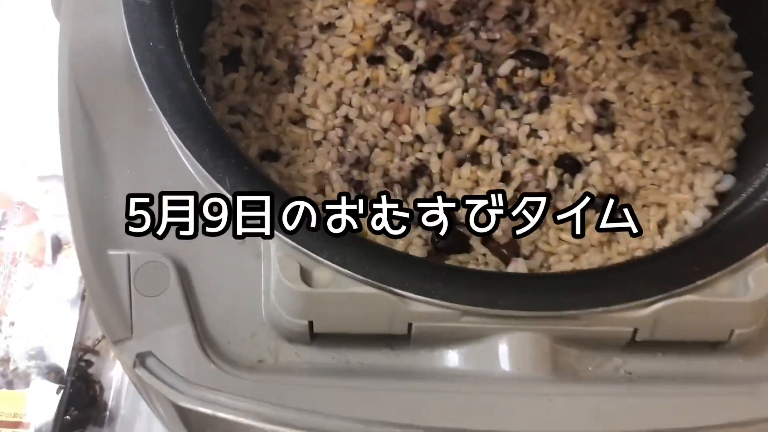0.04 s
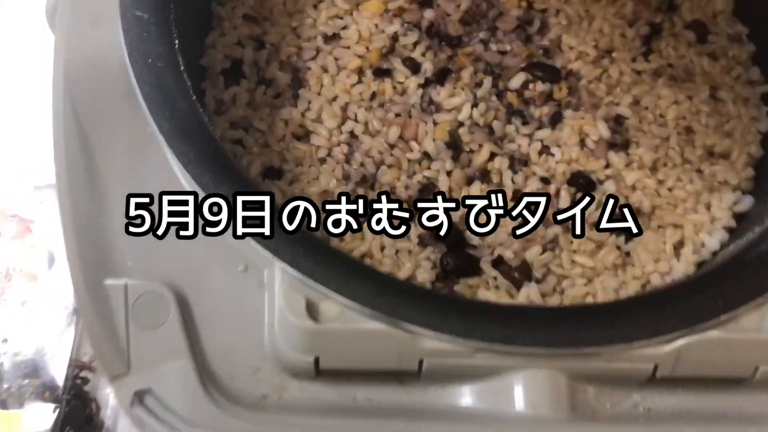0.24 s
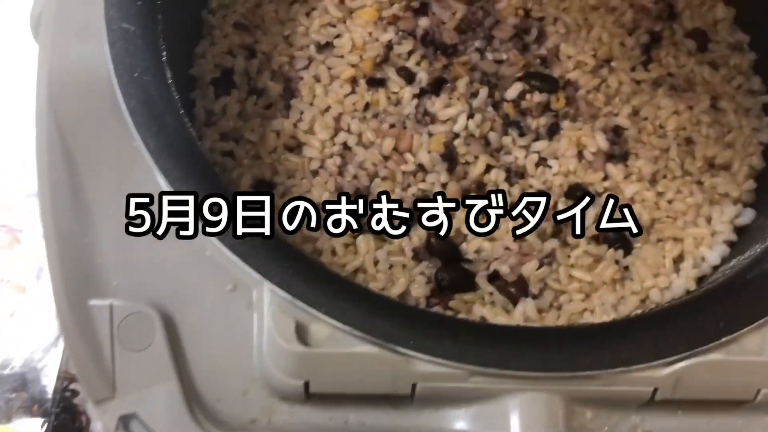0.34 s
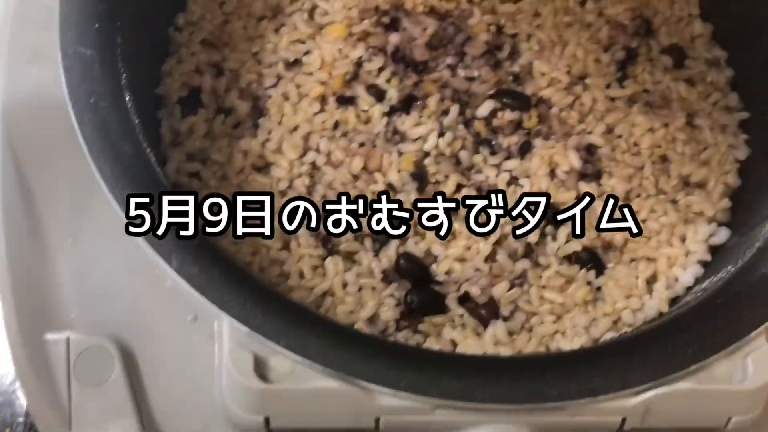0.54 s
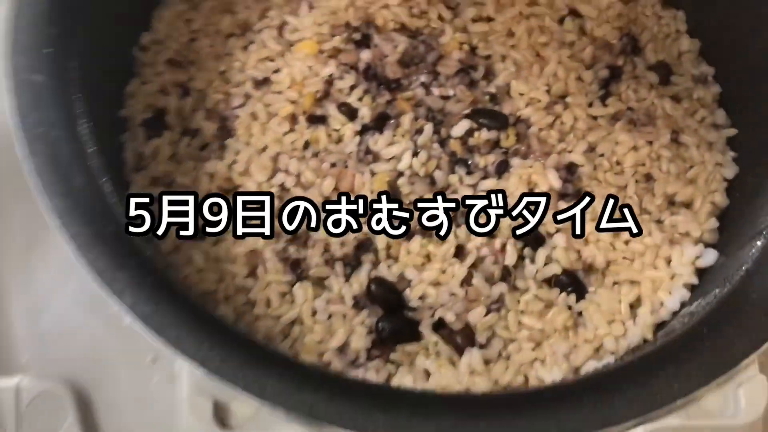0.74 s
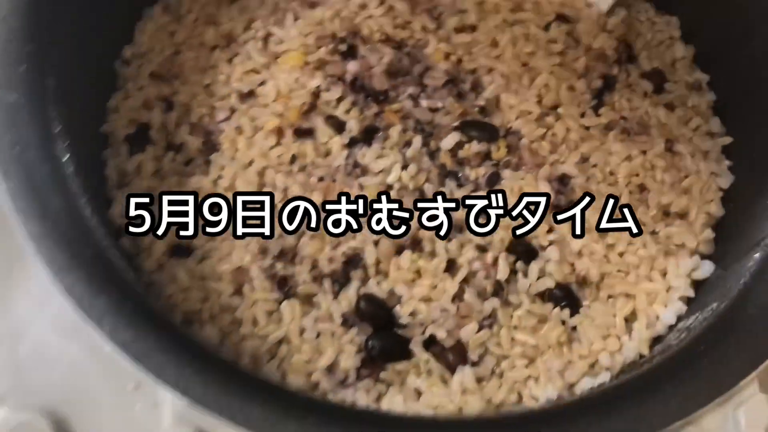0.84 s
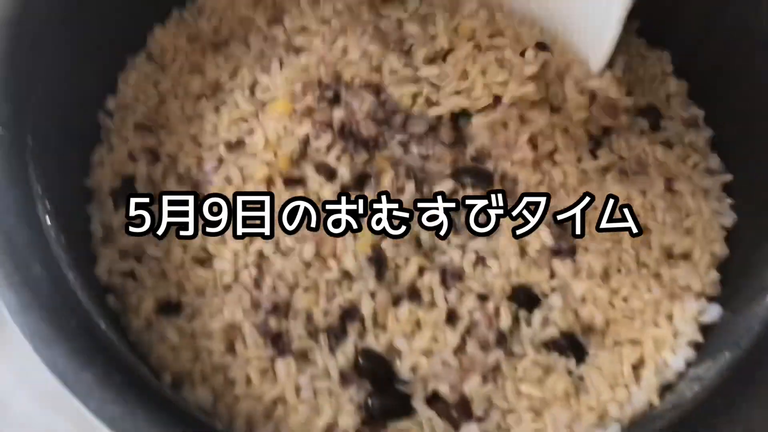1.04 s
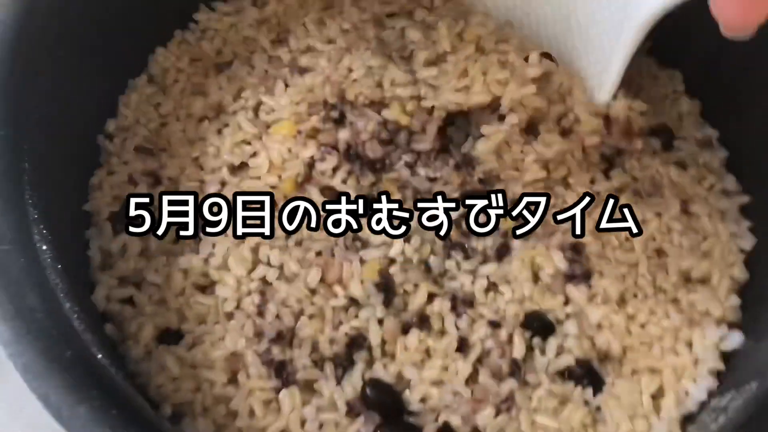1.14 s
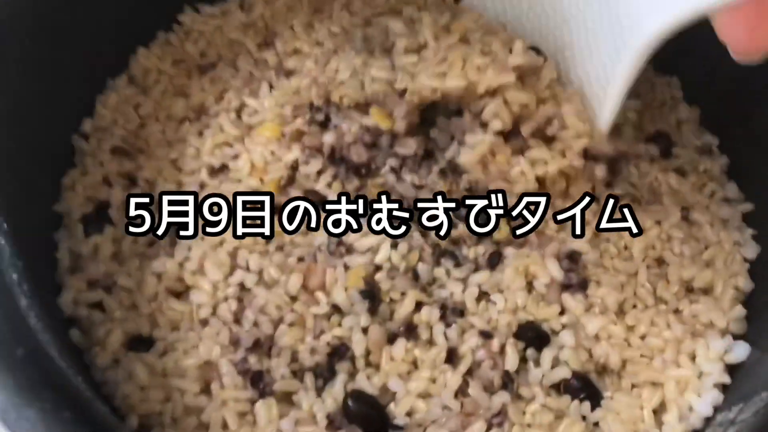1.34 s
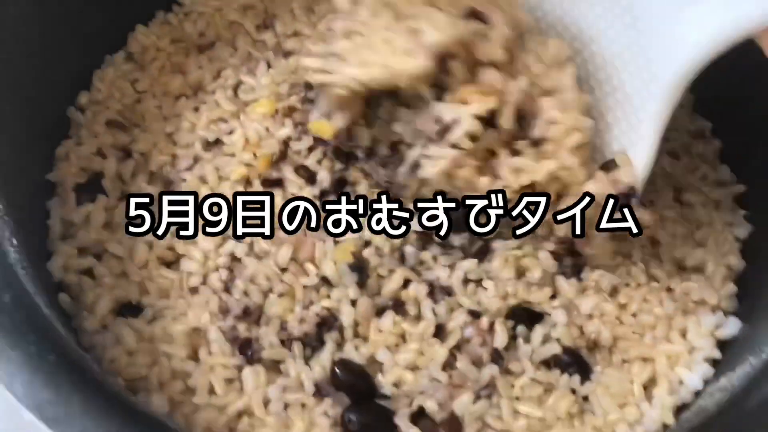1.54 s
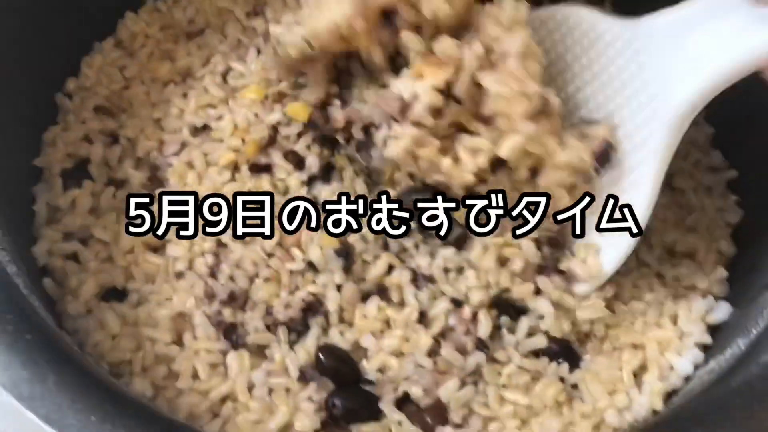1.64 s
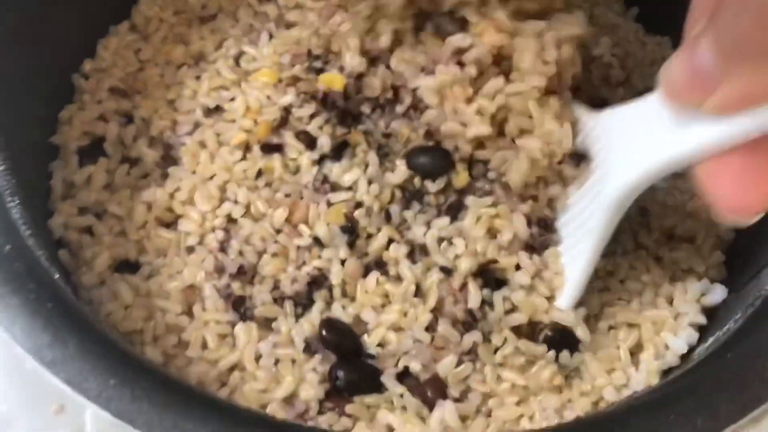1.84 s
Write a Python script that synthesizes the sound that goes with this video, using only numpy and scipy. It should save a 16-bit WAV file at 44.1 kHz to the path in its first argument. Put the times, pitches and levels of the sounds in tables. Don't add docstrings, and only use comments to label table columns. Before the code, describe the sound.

A plastic rice paddle snaps loose with one hard crack, then knocks, scrapes and stirs sticky rice

```python
import sys
import numpy as np
from scipy import signal
from scipy.fft import rfft, irfft
from scipy.io import wavfile
from scipy.ndimage import uniform_filter1d

SR = 44100
rng = np.random.default_rng(int(sys.argv[2]) if len(sys.argv) > 2 else 0)


def field_ratio(decibels):
    return 10 ** (np.asarray(decibels, dtype=float) / 20)


def inscribe(sig):
    pcm = np.round(np.clip(np.atleast_2d(sig).T, -1, 1) * 32767)
    wavfile.write(sys.argv[1], SR, pcm.astype(np.int16))


N = 83790


def level(x, db=0):
    return x * field_ratio(db) / np.sqrt(np.mean(x ** 2))


def colour(x, points):
    p = np.array(points, float)
    hz = np.fft.rfftfreq(len(x), 1 / SR)
    gain_db = np.interp(np.log(hz + 1), np.log(p[:, 0]), p[:, 1])
    return irfft(rfft(x) * field_ratio(gain_db), len(x))


def band(x, hz, width):
    sharpness = max(hz / width, .3)
    return signal.lfilter(*signal.iirpeak(min(hz, .4 * SR), sharpness, SR), x)


def walk(rate):
    k = int(SR / rate)
    steps = np.repeat(rng.standard_normal(N // k + 1), k)
    return 1.30 * uniform_filter1d(uniform_filter1d(steps, k), k)[:N]


def curve(rows):
    p = np.array(rows, float)
    return field_ratio(np.interp(np.arange(N) / SR, p[:, 0], p[:, 1], -120, -120))


def ring(hz, t60, rise_s=0.0001):
    t = np.arange(int(.3 * SR)) / SR
    return np.sin(2 * np.pi * hz * t) * field_ratio(-60 * t / t60) * (1 - np.exp(-t / rise_s))


def add(out, at_s, x):
    i = int(at_s * SR)
    out[i:i + len(x)] += x[:max(len(out) - i, 0)]


def grains(rate, spread_db, smooth):
    chance, sign, size = rng.random((3, N))
    slips = (chance < rate / SR) * np.sign(sign - .5) * field_ratio(-spread_db * np.log(size + .03))
    return level(slips) + smooth * rng.standard_normal(N)


def rub(rows, points, rate, spread_db, smooth, patchy_db, pace):
    out = np.zeros(N)
    for lo, hi in [(30, 700), (700, 1800), (1800, 4600), (4600, 20000)]:
        slips = grains(rate, spread_db, smooth) * field_ratio(patchy_db * walk(pace))
        out += signal.lfilter(*signal.butter(2, [lo, hi], "band", fs=SR), slips)
    return level(colour(out, points)) * curve(rows)


def part(rows, width, t60, click):
    out, t = np.zeros(N), np.arange(1000) / SR
    for at, db, hz in rows:
        fizz = rng.standard_normal(len(t)) * field_ratio(-60 * t / t60)
        burst = fizz + click * (t == 0)
        x = band(band(burst, hz, hz * width), hz, hz * width * 1.8)
        add(out, at + 0.0009, field_ratio(db) * x / np.abs(x).max())
    return out


# [f/Hz, level/dB per Hz]
KITCHEN_COLOUR = [(24, -9.5), (50, 6.5), (351, 1.5), (616, -3.5), (913, -9), (1840, -14), (3330, -18),
                  (12100, -24), (16500, -27.5)]
# [t/s, level/dB]
NEARING_GAIN = [(0, 7), (.06, 2), (.2, 2.5), (.3, 10), (1.9, -1)]
# [t/s, level/dB]
HANDLING_GAIN = [(0, -1.5), (.95, 0.5), (1.15, 4.5), (1.45, 2.5), (1.9, 6)]


def kitchen():
    out, noise = np.zeros(N), colour(rng.standard_normal(N), KITCHEN_COLOUR)
    for hz in 25 * 2 ** np.arange(0, 9.6, .5):
        gain = 1
        if hz > 1500:
            gain = curve(NEARING_GAIN)
        elif hz < 90:
            gain = curve(HANDLING_GAIN)
        out += band(noise, hz, hz / 3) * field_ratio(1.2 * walk(8.3)) * gain
    return level(out, -67)


# [t/s, peak level/dB, f/Hz, t60/s]
KNOCK_HITS = [(0.002, -53, 583, 0.036), (0.021, -53, 387, 0.05), (0.063, -42, 482, 0.022),
              (0.074, -54, 420, 0.027), (.092, -64, 483, 0.13), (0.1296, -56.5, 1790, 0.0086),
              (0.131, -58.5, 900, 0.035), (0.304, -38.5, 450, 0.015), (.334, -53.5, 700, .02),
              (0.3742, -37, 1370, 0.011), (.375, -50.5, 2990, 0.024), (.376, -46.5, 526, 0.024),
              (0.451, -49.5, 437, 0.037), (0.477, -48, 1040, 0.018), (0.494, -54.5, 513, 0.028),
              (0.534, -54, 415, 0.037), (0.641, -54.5, 430, 0.028), (0.709, -50.5, 1085, 0.036),
              (.826, -48.5, 1210, 0.02), (.827, -47, 1960, 0.012), (0.8284, -40, 560, 0.012),
              (0.8296, -41, 438, 0.05), (.845, -54.5, 111, 0.05), (0.849, -48.5, 510, 0.038),
              (.861, -57, 462, 0.061), (.932, -44.5, 1183, 0.0098), (0.933, -49.5, 567, 0.021),
              (1.013, -56.5, 1560, 0.0069), (1.429, -55.5, 386, 0.024), (1.713, -54.5, 466, 0.023)]


def knocks():
    bend_hz, bend_s, bend_db = 1973, .0022, -3.5
    rise_cycles, scuff_db, scuff_t60_s = 0.21, -7, 0.017
    out, t = np.zeros(N), np.arange(3000) / SR
    fall = np.exp(-t / bend_s)
    for at, db, hz, t60 in KNOCK_HITS:
        cycles = hz * t + max(bend_hz - hz, 0) * bend_s * (1 - fall)
        bend = np.sin(2 * np.pi * cycles) * t / bend_s * fall
        body = ring(hz, t60, rise_cycles / hz)[:len(t)]
        body = body + field_ratio(bend_db) * bend * (hz > 200)
        add(out, at + .001, field_ratio(db + 4) * band(body, 1.5 * hz, 4 * hz))
        scuff_hz = min(2.5 * hz, 1900)
        scuff = rng.standard_normal(len(t)) * field_ratio(-60 * t / scuff_t60_s)
        scuff = band(band(scuff, scuff_hz, scuff_hz), scuff_hz, scuff_hz)
        add(out, at + 0.000906, field_ratio(db + scuff_db) * scuff / np.abs(scuff).max())
    return out


# [t/s, peak level/dB, f/Hz]
BRIGHT_TICKS = [(0.0493, -50, 7700), (.3695, -51, 7500), (.3755, -40, 6840), (0.4575, -35.5, 7150),
                (.468, -50, 8620), (0.4778, -40.5, 9300), (.485, -55, 12500), (.516, -51, 9000),
                (.522, -51, 12500), (0.531, -37.5, 11600), (0.5345, -43, 11000), (0.5385, -46, 11500),
                (.548, -49, 13000), (.575, -52, 13500), (0.5759, -33, 8100), (0.595, -48, 9500),
                (0.607, -39, 12000), (0.618, -51, 11000), (.627, -54, 13500), (0.6305, -45, 8000),
                (.634, -44, 8460), (0.6451, -38, 8300), (0.6485, -39, 10500), (.661, -50, 6000),
                (.666, -44, 9000), (.6685, -45, 11000), (.707, -53, 9500), (0.7377, -46.5, 8600),
                (0.9462, -47.5, 9900), (0.9524, -49, 10100), (1.182, -41, 10000), (1.192, -36.5, 12000),
                (1.3184, -51, 7540), (1.3969, -38, 9200), (1.458, -57, 10000), (1.5205, -52.5, 6944),
                (1.525, -55, 11500), (1.535, -54, 8500), (1.5574, -50.5, 9400), (1.592, -50, 7870),
                (2, -50, 8500), (1.68, -52, 7600), (1.6904, -51, 11700), (1.7355, -52, 6500)]


def sticky_ticks():
    return part(BRIGHT_TICKS, width=0.55, t60=0.0041, click=4)


# [t/s, level/dB, f/Hz, t60/s]
PING_HITS = [
    (0.0497, -57.5, 6680, 0.03),
    (.806, -65, 6430, 0.057),
]


def pings():
    out = np.zeros(N)
    for at, db, hz, t60 in PING_HITS:
        add(out, at, field_ratio(db) * ring(hz, t60))
    return out


# [f/Hz, level/dB, t60/s]
PADDLE_MODES = [(4714, -9, .016), (5025, -11, .018), (5420, -13, .02), (6424, -3, .013), (6730, -20, .04),
                (7420, -6, .029), (8146, -3, .02), (8850, -13, .045), (9875, -17, .025), (10460, -17, .02),
                (11750, -19, .025)]
# [f/Hz, level/dB, t60/s]
POT_MODES = [(1250, -8, 0.12), (1362, -8.5, .22), (1897, -14.5, 0.34), (2170, -8, 0.089), (2977, -8, 0.27),
             (3686, -11, .3), (4054, -5, 0.089), (4339, -10, .19), (4660, -12, 0.088), (5023, -9.5, 0.12),
             (5400, -12.5, 0.26), (7460, -12, 0.11)]
# [delay t/s, level/dB, f/Hz, t60/s]
HOUSING_THUDS = [(0.0019, -13.5, 578, 0.013), (0.0033, -31.5, 334, 0.065), (0.00922, -44, 430, 0.051),
                 (0.00062, -17, 1300, 0.0076), (0.00042, -17, 2965, 0.025), (.0005, -26, 3720, .015),
                 (.0005, -18.5, 1980, 0.012), (.004, -32, 270, 0.034), (0.0029, -21, 5000, 0.0093)]


def snap():
    at_s, crack_db, crack_s, crack_hz = .2269, -5, 0.00048, 3220
    ring_db, pot_db = -15, -46
    out, t = np.zeros(N), np.arange(2000) / SR
    crack_filter = signal.butter(4, crack_hz, "high", fs=SR)
    for late, db in [(0, 0), (0.0039, -13.5)]:
        burst = rng.standard_normal(len(t)) * np.exp(-t / crack_s)
        add(out, at_s + late, field_ratio(crack_db + db) * signal.lfilter(*crack_filter, burst))
    for k, (hz, db, t60) in enumerate(PADDLE_MODES):
        add(out, at_s, (-1) ** k * field_ratio(ring_db + db) * ring(hz, t60))
    for hz, db, t60 in POT_MODES:
        add(out, at_s, field_ratio(pot_db + db) * ring(hz, t60, .002))
    for late, db, hz, t60 in HOUSING_THUDS:
        add(out, at_s + late, field_ratio(db) * ring(hz, t60, 0.0012))
    return signal.lfilter(*signal.butter(2, 160, "high", fs=SR), out)


# [t/s, level/dB]
RUSTLE_LEVEL = [(.235, -42.5), (.3, -63), (.36, -58.5), (.4, -60.5), (.5, -58.5), (.55, -71), (.567, -54),
                (.585, -70.5), (.67, -64.5), (.7, -76), (.74, -67), (.8, -74)]
# [f/Hz, level/dB per Hz]
RUSTLE_TONE = [(120, -14), (520, 1), (1320, -7), (3190, -13.5), (9060, -11.5), (16000, -27)]


def rustle():
    return rub(RUSTLE_LEVEL, RUSTLE_TONE, 1200, spread_db=3.0, smooth=.8, patchy_db=2.2, pace=60)


# [t/s, peak level/dB, f/Hz]
SMACKS = [(.3035, -46, 1500), (0.3744, -33.5, 2300), (.566, -45.5, 1700), (.569, -51, 4000),
          (0.6685, -40.5, 3800), (1.1316, -46, 6350), (1.182, -39, 5500), (1.3969, -45, 4480),
          (1.4285, -51.5, 3000), (1.62, -39.5, 5900), (1.6239, -39.5, 6580), (1.6525, -39.5, 3200),
          (1.871, -45, 5400)]


def wet_smacks():
    return part(SMACKS, width=0.87, t60=0.0051, click=4)


# [t/s, level/dB]
SLIDE_LEVEL = [(.825, -64), (.84, -53), (.85, -52), (.88, -58), (.895, -70.5), (.93, -100), (.935, -53.5),
               (.96, -76)]
# [f/Hz, level/dB per Hz]
SLIDE_TONE = [(90, -21), (200, -8), (500, -8), (2100, -19.5), (3300, -19), (8200, -27.5), (16000, -38)]


def slide():
    return rub(SLIDE_LEVEL, SLIDE_TONE, 2500, spread_db=3.9, smooth=0.7, patchy_db=2.5, pace=150)


# [t/s, peak level/dB, f/Hz]
POCKETS = [(.8451, -44, 3300), (.849, -50, 2900), (.856, -52, 3700), (.873, -55, 1600), (1.071, -56, 3200),
           (1.378, -56.5, 3310), (1.5917, -54, 3450), (1.596, -55, 3400), (1.621, -46, 3500),
           (1.636, -60, 880), (1.659, -47, 2510), (1.664, -50, 3380), (1.713, -52, 2440),
           (1.807, -56, 2400), (1.813, -59, 3000), (1.818, -52, 2180), (1.823, -46, 2310),
           (1.825, -50, 1230), (1.829, -49, 2300), (1.831, -52, 1100), (1.837, -49, 2400),
           (1.865, -50, 2200), (1.876, -60, 3400), (1.887, -52, 2100), (1.895, -54, 3200)]


def wet_pops():
    return part(POCKETS, width=0.36, t60=.01, click=4)


# [t/s, level/dB]
SCRAPE_LEVEL = [(1.04, -80), (1.075, -67), (1.14, -56), (1.17, -60), (1.24, -57), (1.27, -59),
                (1.342, -60.5), (1.353, -74)]
# [f/Hz, width f/Hz, level/dB]
WALL_MODES = [(526, 82, 12), (827, 234, 8), (1015, 180, 1), (2176, 26, 0), (2935, 115, -2.5),
              (3380, 83, -6), (3700, 70, -2.5), (4270, 130, -3), (6420, 170, -0.5), (6830, 80, -1.5),
              (7260, 130, -3), (8750, 43, -4), (9850, 130, -18), (10100, 67, -1.5)]


def scrape():
    slips = grains(4000, 3.0, 1.1) * field_ratio(2.2 * walk(70))
    wall = np.zeros(N)
    for hz, width, db in WALL_MODES:
        wall += field_ratio(db + 4 * walk(18.2)) * band(slips, hz, width)
    air = field_ratio(-23.0) * level(band(grains(580, 6.1, 0.73), 11000, 12000))
    rasp = field_ratio(-11.5) * level(band(slips, 4260, 2900))
    return (level(wall) + air + rasp) * curve(SCRAPE_LEVEL)


# [t/s, level/dB]
STIR_LEVEL = [(1.375, -67.5), (1.43, -68.5), (1.5, -71.5), (1.56, -65), (1.6, -59.5), (1.635, -58),
              (1.645, -59.5), (1.66, -58.5), (1.69, -63), (1.745, -66.5), (1.805, -66.5), (1.825, -58.5),
              (1.845, -63.5), (1.872, -58.5), (1.885, -64.5), (1.9, -59.5)]
# [f/Hz, level/dB per Hz]
WET_TONE = [(150, -17), (300, -8), (980, -1), (1720, -10), (2300, -5.5), (3520, -7), (4800, -10.5),
            (16000, -13)]


def stir():
    return rub(STIR_LEVEL, WET_TONE, 2500, spread_db=6.5, smooth=0.4, patchy_db=2.3, pace=120)


def room(x):
    room_db, t60_s, treble_t60_s, turn_hz = -23.5, 0.35, 0.061, 3000
    t = np.arange(SR // 2) / SR
    n = rng.standard_normal(len(t))
    low = signal.lfilter(*signal.butter(1, turn_hz, fs=SR), n)
    tail = low * field_ratio(-60 * t / t60_s) + (n - low) * field_ratio(-60 * t / treble_t60_s)
    tail = tail * (1 - np.exp(-t / 0.0039))
    return signal.fftconvolve(x, tail / np.sqrt(np.sum(tail ** 2)))[:N] * field_ratio(room_db)


def scene():
    background = kitchen()
    near = knocks() + sticky_ticks() + pings() + snap() + rustle()
    near = near + wet_smacks() + slide() + wet_pops() + scrape() + stir()
    return (near + room(near) + background)[None]


def roll_off(x):
    return signal.sosfilt(signal.butter(12, 17140, fs=SR, output="sos"), x)


def record(dry):
    x = signal.sosfilt(signal.butter(2, 32, "high", fs=SR, output="sos"), dry)
    x = signal.sosfilt(signal.ellip(6, .5, 50, 15900, fs=SR, output="sos"), x)
    return roll_off(x)


dry = scene()
out = record(dry)
inscribe(out)
```